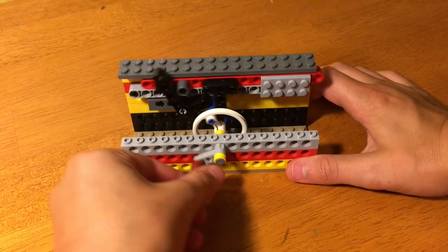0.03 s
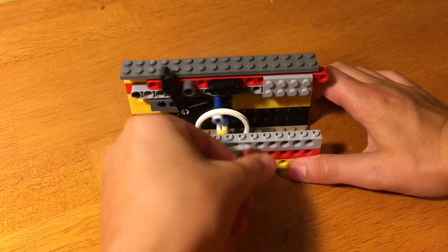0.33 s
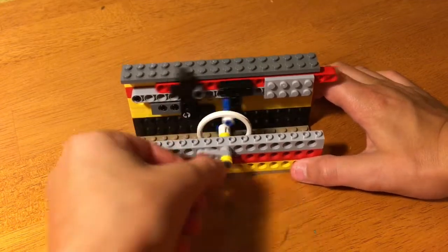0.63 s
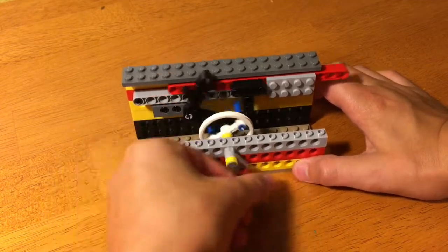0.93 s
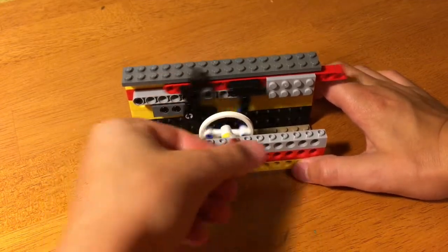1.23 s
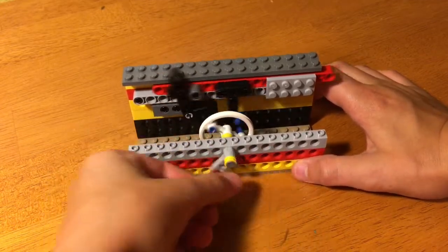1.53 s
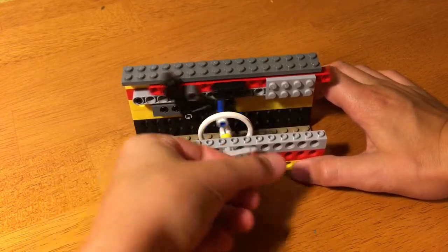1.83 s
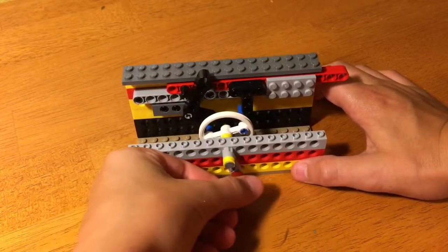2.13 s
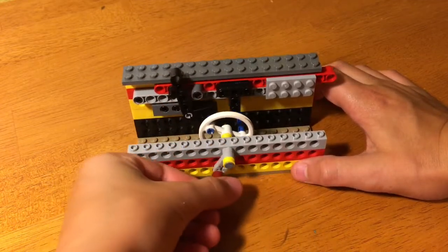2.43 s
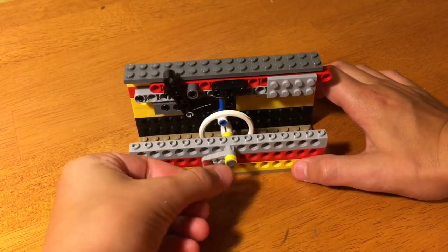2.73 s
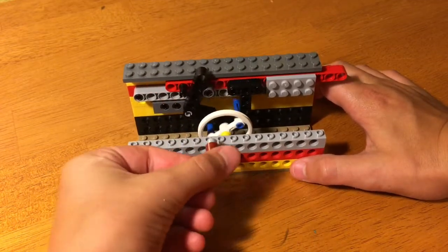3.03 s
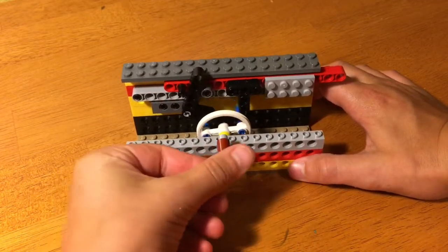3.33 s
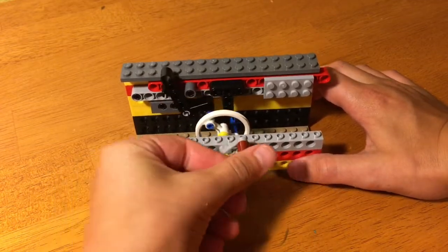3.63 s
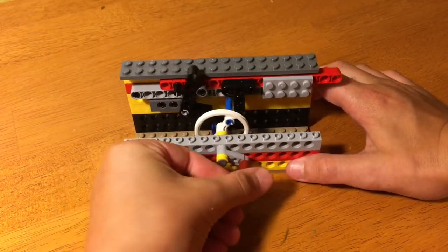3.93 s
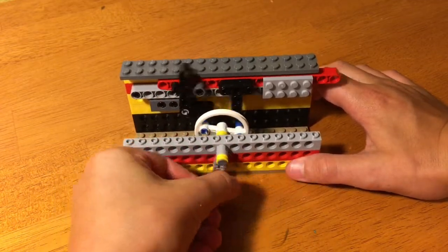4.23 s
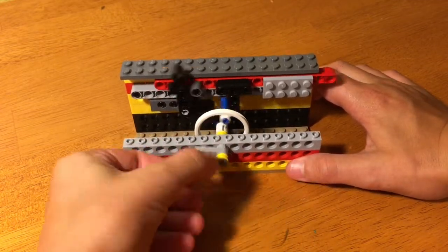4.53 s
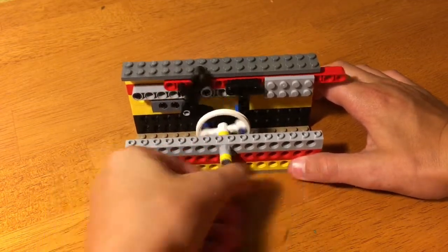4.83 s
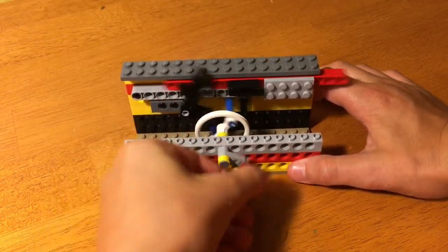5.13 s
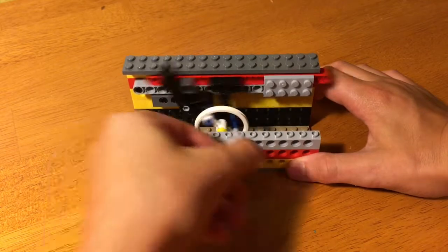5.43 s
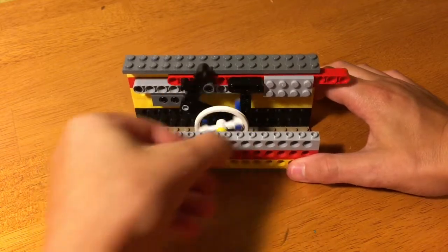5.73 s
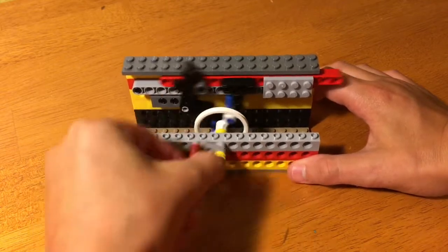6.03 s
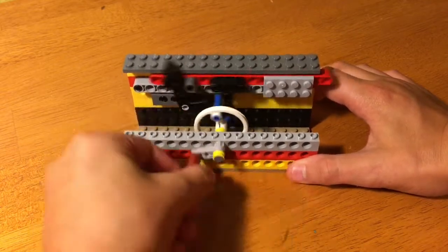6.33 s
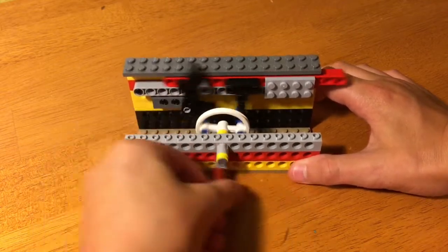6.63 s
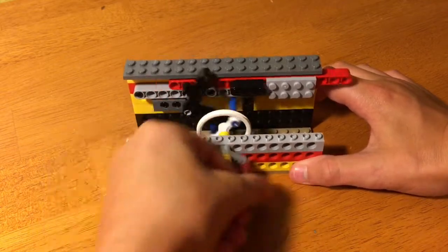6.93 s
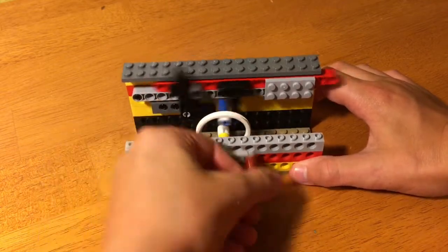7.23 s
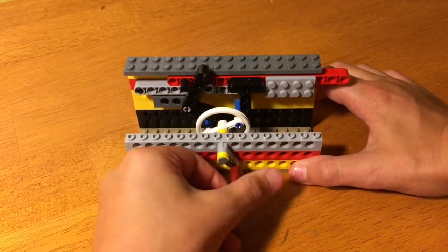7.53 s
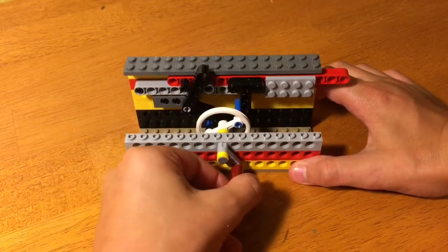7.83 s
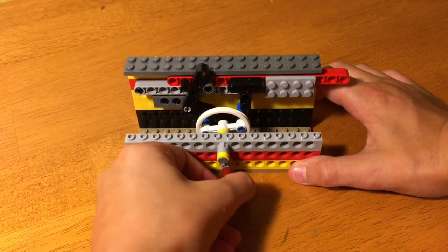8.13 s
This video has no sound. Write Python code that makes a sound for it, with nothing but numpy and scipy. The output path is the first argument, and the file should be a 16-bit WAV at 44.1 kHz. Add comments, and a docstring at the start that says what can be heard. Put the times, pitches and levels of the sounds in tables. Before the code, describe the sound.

A hand-cranked mechanism of plastic building bricks works on a wooden table, heard close in a small room. For the first 2 seconds it clicks and rattles lightly and unevenly, several times a second, with brief creaks, soft scraping and the faint high tinkle of a loose pin. From about 2 to 4.6 seconds it goes much quieter, with only scattered slow ticks. At about 4.7 seconds the turning becomes hard and fast: a sliding rack slams into its stop nine times, nearly three times a second, each sharp snap followed by smaller clacks of a loose lever falling back. The blows thump the frame against the table, with rough scraping underneath. Around 7.4 seconds it eases into a few soft clicks until the end at about 8 seconds. A faint, wavering low hum fills the room throughout.

```python
"""Hand-cranked plastic brick mechanism.

On a wooden table in a small room, a lever and a sliding rack clack against their stops: lightly, then
a few slow ticks, then hard and fast. Each hard turn kicks the rack along its guide into its stop and
the loose lever falls back a few times. Blows thump the frame on the table, sliding parts scrape and
creak, a loose pin tinkles. A low hum fills the room."""
import sys
import numpy as np
from scipy import signal
from scipy.fft import rfft, irfft, next_fast_len
from scipy.io import wavfile
from scipy.ndimage import uniform_filter1d

SR = 44100
rng = np.random.default_rng(int(sys.argv[2]) if len(sys.argv) > 2 else 0)


def dump_mix(stems):
    """Bounce the given channels to the path in sys.argv[1] as a 16-bit WAV at rate SR."""
    frames = np.atleast_2d(stems).T  # one column per channel
    limited = np.clip(frames, -1, 1)  # hard clip at full scale
    pcm = np.round(limited * 32767).astype(np.int16)
    wavfile.write(sys.argv[1], SR, pcm)


N = 360297
RING_SAMPLES, CUTOFF_HZ, MEDIUM_DB = 8192, 16100, -45

# Rack throws: start_s, travel_s, kick_db, slam_db, thump_db
THROWS = [(.0672, 0.06, -40.5, -35, -36.5), (4.7963, 0.052, -33.5, -26, -33.5),
          (5.182, 0.05, -33, -24.5, -32), (5.538, 0.06, -32.5, -28.5, -35.5),
          (5.8986, 0.061, -35.5, -26, -34.5), (6.2521, .0587, -38.5, -29, -36.5),
          (6.6166, 0.058, -39, -29, -37.5), (6.9607, .062, -37.5, -30, -32),
          (7.2989, 0.061, -35, -27, -33.5)]
# Where the rack catches: travel_fraction
CATCH_POINTS = [0.33, .55]
# Lever falling back on its stop: start_s, clack_db, snap_db
LEVER_FALLS = [(0.0232, -43, -48), (0.1003, -37.5, -40), (0.2779, -41, -43.5), (0.4098, -38, -47.5),
               (.53, -51, -46.5), (.548, -44, -52), (0.6848, -41, -51.5), (0.9042, -46, -83),
               (.926, -40, -44.5), (1.055, -40.5, -55), (1.1729, -37.5, -48), (1.309, -43.5, -40),
               (1.392, -40, -44), (1.5581, -46.5, -41.5), (1.664, -39, -39), (1.7403, -47, -51.5),
               (1.8113, -43, -44), (1.901, -37.5, -41.5), (2.0398, -57.5, -77), (2.3327, -69, -78),
               (2.4257, -59, -55), (2.8332, -58.5, -57.5), (3.0446, -58.5, -66), (4.252, -54, -57),
               (4.2744, -52, -57), (4.5397, -59, -60), (4.737, -44, -43), (4.9378, -33, -33),
               (4.9857, -32.5, -31.5), (5.01, -37.5, -33.5), (5.125, -37.5, -33), (5.2965, -40.5, -39.5),
               (5.365, -44.5, -39), (5.4446, -50.5, -56), (5.6473, -33.5, -35), (5.6643, -43, -42.5),
               (5.725, -45.5, -45), (5.8405, -40.5, -36), (6.004, -35, -28.5), (6.064, -43, -40),
               (6.3374, -34, -35), (6.3952, -43, -39.5), (6.5403, -43, -40.5), (6.714, -38.5, -50),
               (6.79, -40, -41), (6.8907, -39.5, -54), (7.0673, -34.5, -30.5), (7.137, -37.5, -48),
               (7.1668, -42.5, -35.5), (7.24, -42.5, -38), (7.4545, -55.5, -63), (7.5238, -62.5, -69),
               (7.595, -56.5, -66), (7.6569, -52, -60.5), (7.6714, -44.5, -62.5), (7.8887, -55.5, -64),
               (7.9217, -49.5, -57.5)]
# Rack clicking on its guide: start_s, level_db
RACK_CLICKS = [(0.0369, -37.5), (0.2603, -46.5), (0.5676, -45.5), (0.7812, -44.5), (0.8176, -44.5),
               (0.8383, -43), (1.0337, -46.5), (1.0769, -47.5), (1.1086, -49), (1.2663, -38.5),
               (1.3001, -38), (1.5676, -45), (1.832, -41.5), (2.1293, -64.5), (2.3767, -60.5),
               (2.3939, -52), (2.7915, -64.5), (2.9497, -71), (2.994, -59.5), (3.3831, -68), (3.469, -70),
               (3.5133, -64.5), (3.861, -64), (3.8966, -63), (4.559, -57), (4.6699, -43.5), (4.6937, -49.5),
               (4.7511, -40.5), (5.084, -34), (5.1577, -41.5), (5.389, -33.5), (5.48, -38.5), (5.492, -33),
               (5.5548, -29), (5.8216, -32), (5.882, -40.5), (6.0899, -37.5), (6.1543, -34), (6.1757, -45),
               (6.4054, -37.5), (6.4247, -37.5), (6.5068, -45.5), (6.7209, -31.5), (6.85, -44),
               (6.8607, -32.5), (6.9005, -33.5), (7.209, -28), (7.431, -48.5)]
# Pin flicks: start_s, level_db
TINKLES = [(0.2368, -60), (.487, -63.5), (0.7427, -61), (0.991, -62), (1.2559, -60.5), (1.475, -63),
           (1.548, -67), (1.718, -60.5), (1.971, -59), (2.063, -69), (2.0976, -68), (3.882, -68.5),
           (4.0145, -57)]
# Rack stick-slip: start_s, length_s, slip_rate_hz, level_db
CREAKS = [(.022, 0.036, 640, -39.5), (0.278, 0.033, 420, -47.5), (0.54, 0.05, 550, -52),
          (1.055, 0.03, 530, -50)]
# Crank effort as friction level: time_s, effort_db
EFFORT = [(0, -57.5), (.6, -57), (.93, -54.5), (1.2, -61), (1.95, -54), (2.18, -67.5), (2.9, -65),
          (3.3, -67), (3.8, -66), (4.05, -62.5), (4.55, -66.5), (4.95, -47), (5.55, -45), (5.76, -53.5),
          (6.4, -44), (6.75, -51.5), (7.25, -44), (7.5, -62.5), (8.17, -67)]
# Lever taking up its play: effort_db, delay_s
LEVER_PLAY = [(-56.5, 0.001967), (-48, .001)]
# Loose parts settling at low effort: effort_db, gain_db
SETTLING = [(-74.5, -13.5), (-62, -0.5)]

# Modes of frame, lever, hollow bricks, pin: freq_hz, level_db, t60_s, gain_db_per_force_db
FRAME_MODES = [(135, -3, 0.2, 0.06), (159, -7, 0.15, -0.36), (212.6, -7, 0.28, -0.22),
               (232.5, -7.5, 0.38, -0.05), (266.5, -4.5, 0.23, 0), (305, 0.5, 0.15, 0.02),
               (352.2, 2, 0.16, 0.5), (402, -4, 0.14, 0.35), (460.3, -3, 0.18, 0.48), (545, -2.5, 0.059, 0),
               (622.6, -2, 0.089, 0.23)]
LEVER_MODES = [(711, -10.5, 0.055, -0.18), (832, -6, 0.021, 0), (991.5, -9, 0.036, 0), (1183, -1, 0.021, 0),
               (1216, -1, 0.026, 0), (1320, -2.5, 0.022, 0.25), (1457, -5, 0.015, 0),
               (1554, -6.5, 0.027, 0.14), (1638, -9.5, 0.015, 0), (1890, -8, 0.014, 0.24),
               (2140, -21, 0.032, 0.35)]
BRICK_MODES = [(1820, 6, 0.031, -0.39), (2126, 1, 0.062, -0.19), (2730, -2, 0.046, -0.15),
               (3444, -7.5, 0.048, -1), (4225, 0.5, 0.024, 0), (4600, 0.5, 0.01, 0.5),
               (4885, -7.5, 0.029, 0.5), (5380, -17.5, 0.038, 1.16), (6090, -12, 0.024, 1),
               (6570, -15, 0.076, 0), (7890, -5, 0.028, 0), (9190, 4, 0.012, 0), (11020, -6.5, 0.013, 0.5)]
PIN_MODES = [(4400, -5, 0.12, 16), (5200, -26, .28, 8), (7100, 13, 0.15, 14), (13020, 11, 0.092, 14)]
# Spectra of brick contact, stick-slip, sliding, axle, room noise: freq_hz, gain_db
SNAP_SPECTRUM = [(200, -14.5), (700, -4.5), (1500, 3), (2100, 6), (2450, 5), (2800, 4), (3400, 2),
                 (4800, 5.5), (6900, -2), (9200, -5), (10500, -8.5), (13200, -10.5), (16000, -16)]
CREAK_SPECTRUM = [(500, -13), (1250, 14), (1800, -6), (2400, -19), (3400, 7.5), (5000, -3), (6500, -11),
                  (12000, -20)]
SCRAPE_SPECTRUM = [(60, -1.5), (200, 10.5), (350, 8), (550, 3.5), (1250, 2), (2100, -9), (3400, -9.5),
                   (4900, -11), (9000, -20.5), (16000, -45.5)]
RUMBLE_SPECTRUM = [(60, -35), (130, 17), (180, -3.5), (220, -3), (300, 2), (400, 8), (470, -6),
                   (560, -26.5), (900, -41), (3000, -58.5)]
AIR_SPECTRUM = [(15, -60.5), (30, -18), (55, -1.5), (85, 5), (125, -2), (175, -11), (260, -24),
                (400, -21.5), (650, -28.5), (1300, -48), (2400, -37), (5000, -52), (9000, -43.5),
                (16000, -52)]

# Axle rumble and rattle against effort: at_medium_db, slope_db_per_db
RUMBLE_LAW = (-51.5, 0.71)
RATTLE_LAW = (-40, 1.47)
# Frame, lever and treble response against knock level: at_medium_db, slope_db_per_db
CLICK_THUMP_LAW, CLICK_CLACK_LAW = (-47, 0.58), (-53, 0.64)
FALL_THUMP_LAW, TREBLE_LAW = (-49.5, 0.74), (-3, 0.31)

# Room decay: freq_hz, t60_s
ROOM_DECAY = [(120, 1), (400, 0.28), (1100, 0.22), (2800, 0.23), (7000, 0.24), (15000, 0.17)]
# Room hum: time_s, level_db
HUM_LEVEL = [(0, -51), (.7, -61), (1.6, -51), (2.2, -58.5), (2.65, -48.5), (3.3, -56), (4.3, -56.5),
             (5.4, -51), (5.9, -54), (6.8, -51), (7.7, -54), (8.17, -51)]


def knocks(treble_spread_db=4, rebound_s=.0065, rebound_db=-11):
    """Each contact snaps, rebounds, rings lever and bricks and thumps the frame on the table."""
    blows = [throws(), lever_falls(), click(*np.transpose(RACK_CLICKS)), pin_flicks(), rattle()]
    start_s, thump_db, clack_db, snap_db = np.hstack(blows)
    treble_db = follow(TREBLE_LAW, snap_db) + treble_spread_db * rng.uniform(-1.26, 1, len(start_s))
    lever = bounce(ring(LEVER_MODES, clack_db, spread_db=4, rise_s=.003, detune=.065))
    frame = ring(FRAME_MODES, thump_db, spread_db=4, rise_s=.004, detune=.025)
    bricks = bounce(ring(BRICK_MODES, snap_db, spread_db=6.5, rise_s=.0012, detune=.008))
    snap = place(start_s, at_level(snaps(treble_db), snap_db - 5.5)) + run_up(start_s, snap_db)
    again_s = start_s + rebound_s * (.5 + rng.random(len(start_s)))
    snap += place(again_s, at_level(snaps(treble_db), snap_db + rebound_db))
    snap += place(start_s, at_level(bricks, snap_db - 7))
    clack = place(start_s + lookup(LEVER_PLAY, effort(start_s)), at_level(lever, clack_db))
    thump = place(start_s, at_level(frame, thump_db))
    room_send = amp(-4.5) * snap + amp(1.5) * clack + amp(-5) * thump
    return snap + clack + thump + room(room_send, tail_db=-6)


def throws(catch_jitter=.06):
    """The lever kicks the rack, which catches on the way and slams into its stop."""
    start_s, travel_s, kick_db, slam_db, thump_db = np.transpose(THROWS)
    kick = np.array([start_s, thump_db - 5, kick_db, kick_db + 2])
    blows = [kick, click(start_s + travel_s, slam_db, thump_db)]
    for fraction in CATCH_POINTS:
        catch_s = start_s + travel_s * (fraction + catch_jitter * rng.standard_normal(len(start_s)))
        blows.append(click(catch_s, slam_db - 10, thump_db - 4))
    return np.hstack(blows)


def lever_falls():
    """The loose lever hits its stop and jolts the frame."""
    start_s, clack_db, snap_db = np.transpose(LEVER_FALLS)
    return np.array([start_s, follow(FALL_THUMP_LAW, clack_db), clack_db, snap_db])


def click(start_s, snap_db, thump_db=None):
    """Hard contact jolting frame and lever. Rows: start_s, thump_db, clack_db, snap_db."""
    if thump_db is None:
        thump_db = follow(CLICK_THUMP_LAW, snap_db)
    return np.array([start_s, thump_db, follow(CLICK_CLACK_LAW, snap_db), snap_db])


def snaps(treble_db, crack_s=0.0024, chatter_s=0.01, chatter_db=-6, chatter_top_hz=7500, size=2048):
    """Edges crack together, then neighbouring bricks give a brief, duller chatter."""
    t, count = np.arange(size) / SR, len(treble_db)
    roughness = np.exp(.3 * unit_rms(uniform_filter1d(rng.standard_normal((count, size)), 90)))
    crack, chatter = rng.standard_normal((2, count, size)) * roughness
    crack *= np.exp(-t / crack_s) * (1 - np.exp(-t / 0.00043))
    chatter *= amp(chatter_db) * np.exp(-t / chatter_s) * (1 - np.exp(-t / 0.0023))
    chatter = signal.lfilter(*signal.butter(1, chatter_top_hz, fs=SR), chatter)
    return contact_filter(crack, treble_db) + contact_filter(chatter, treble_db)


def contact_filter(x, treble_db):
    """Each contact point has its own resonances and treble; minimum phase."""
    hz = abs(np.fft.fftfreq(x.shape[-1], 1 / SR))
    knots_hz = np.linspace(0, np.sqrt(SR / 2), num=80) ** 2
    knots_db = rng.uniform(-6, 6, (len(x), len(knots_hz)))
    knots_db += 8 * uniform_filter1d(rng.standard_normal(knots_db.shape), 9)
    resonance_db = np.array([np.interp(hz, knots_hz, row) for row in knots_db])
    shelf_db = (treble_db[:, None] + 7.5) * np.interp(hz, [5500, 10000], [0, 1])
    log_gain = np.log(amp(lookup_hz(SNAP_SPECTRUM, hz) + resonance_db + shelf_db))
    return np.fft.ifft(np.fft.fft(x) * np.exp(np.conj(signal.hilbert(log_gain)))).real


def ring(modes, force_db, spread_db, rise_s, detune):
    """Damped modes, one row a blow; each blow lands elsewhere and excites them differently."""
    t = np.arange(RING_SAMPLES) / SR
    out = np.zeros((len(force_db), RING_SAMPLES))
    excess_db = np.clip(force_db - np.median(force_db), -12, 12)[:, None]
    for hz, level_db, t60_s, growth in modes:
        age_s = t[t < t60_s]
        strength, shift, phase = rng.uniform(-1.034, 1, (len(force_db), 3)).T[:, :, None]
        angle = 2 * np.pi * hz * (1 + detune * shift) * age_s + np.pi * phase
        gain = amp(level_db + growth * excess_db + spread_db * strength)
        out[:, :len(age_s)] += gain * np.sin(angle) * amp(-60 * age_s / t60_s)
    fade_out = np.minimum(1, 10 * (1 - t / t[-1]))
    return out * (1 - np.exp(-t / rise_s)) * fade_out


def bounce(sounds):
    """A loose part meets its stop twice, 1-5 ms apart."""
    lags_s, gains = rng.uniform([.001, .3], [.005, .9], (len(sounds), 2)).T
    return np.array([row + gain * np.r_[np.zeros(round(lag_s * SR)), row][:RING_SAMPLES]
                     for row, lag_s, gain in zip(sounds, lags_s, gains)])


def run_up(start_s, snap_db, lead_s=0.0031, lead_db=-11):
    """Parts scrape just before they hit their stop."""
    ahead_s = np.arange(RING_SAMPLES)[::-1] / SR
    swells = amp(snap_db + lead_db)[:, None] * np.exp(-ahead_s / lead_s)
    scrape = unit_rms(shaped(rng.standard_normal(N), SNAP_SPECTRUM))
    return place(start_s - RING_SAMPLES / SR, swells) * scrape


def rattle(count=200, spread_db=5):
    """Loose parts click at random, louder with effort."""
    start_s = (np.arange(count) + rng.random(count)) / count * N / SR
    effort_db = effort(start_s)
    level_db = follow(RATTLE_LAW, effort_db) + lookup(SETTLING, effort_db)
    return click(start_s, level_db + spread_db * rng.uniform(-2.4, 1, count))


def creaks(slip_spread_db=4):
    """The rack sticks and slips; uneven slips fuse into a hoarse chirp."""
    t = np.arange(RING_SAMPLES) / SR
    bursts = []
    for _, length_s, rate_hz, level_db in CREAKS:
        drift = .22 * unit_rms(uniform_filter1d(rng.standard_normal(RING_SAMPLES), 120))
        slip_count = np.floor(np.cumsum(rate_hz * (1 + drift)) / SR)
        slips = np.diff(slip_count, prepend=0) * amp(slip_spread_db * rng.standard_normal(RING_SAMPLES))
        envelope = np.sin(np.pi * np.minimum(t / length_s, 1))
        bursts.append(amp(level_db + 2) * unit_rms(slips - slips.mean()) * envelope)
    chirps = shaped(place(np.transpose(CREAKS)[0], bursts), CREAK_SPECTRUM)
    return chirps + room(chirps, tail_db=-7)


def pin_flicks(flick_db=13.5, body_db=-1):
    """Light clicks that set the pin ringing."""
    start_s, level_db = np.transpose(TINKLES)
    _, thump_db, clack_db, snap_db = click(start_s, level_db + flick_db)
    return np.array([start_s, thump_db + body_db, clack_db + body_db, snap_db])


def pin_tinkles(wobble_hz=38):
    """The flicked pin rings on, wobbling in its hole."""
    start_s, level_db = np.transpose(TINKLES)
    turns = wobble_hz * rng.uniform(.7, 1.4, (len(start_s), 1)) * np.arange(RING_SAMPLES) / SR
    pin = sum(ring(PIN_MODES, level_db, spread_db=5, rise_s=.003, detune=.011) for _ in range(3))
    return place(start_s, at_level(pin * (1 + np.cos(2 * np.pi * turns)), level_db + 2.5))


def friction(ticks_per_s=300, spread_db=6.5, tick_decay_s=0.01):
    """Sliding parts scrape, rougher with effort; the axle rumbles through the frame."""
    t = np.arange(N) / SR
    effort_db = effort(t)
    rack_scrape, rack_rumble = rack_slide(t)
    ticks = (rng.random(N) < ticks_per_s / SR) * amp(spread_db * np.minimum(rng.exponential(1, N), 3))
    flutter = unit_rms(signal.lfilter([1], [1, -np.exp(-1 / (tick_decay_s * SR))], ticks))
    catching = np.interp(effort_db, [-68, -52], [.3, 1])
    drive = (catching * flutter + amp(-4)) * rng.standard_normal(N)
    scrape = unit_rms(shaped(drive, SCRAPE_SPECTRUM)) * np.hypot(amp(effort_db), rack_scrape)
    axle_gain = amp(follow(RUMBLE_LAW, effort_db))
    rumble = unit_rms(shaped(drive, RUMBLE_SPECTRUM)) * np.hypot(axle_gain, rack_rumble)
    return amp(-6) * scrape + amp(-5) * rumble


def rack_slide(t, scrape_db=-14.5, rumble_db=-15.5, fade_s=0.031):
    """Scrape and rumble gains of the thrown rack: held in travel, fading after the slam."""
    start_s, travel_s, _, slam_db, thump_db = np.transpose(THROWS)[:, :, None]
    moving = (t > start_s) * np.exp(-np.maximum(t - start_s - travel_s, 0) / fade_s)
    return (amp(slam_db + scrape_db) * moving).sum(0), (amp(thump_db + rumble_db) * moving).sum(0)


def effort(time_s, hush_db=-7, hush_s=0.025):
    """Friction level in dB; parts press tight and fall quiet just before a throw."""
    ahead_s = np.transpose(THROWS)[0][:, None] - time_s
    pressed = ((ahead_s > 0) * np.exp(-(ahead_s / hush_s) ** 2)).sum(0)
    return lookup(EFFORT, time_s) + hush_db * pressed


def room(x, tail_db, build_s=0.0011, echoes_per_s=8000, paths=5):
    """Table and wall reflections; the paths change as hands and parts move."""
    size, t = SR * 3 // 5, np.arange(N) / SR
    out = np.zeros(N)
    for k in range(paths):
        taps = rng.choice([-1., 1.], size) * (rng.random(size) < echoes_per_s / SR)
        hz, age_s, bands = signal.stft(taps, SR, nperseg=256)
        decay = amp(-60 * age_s / lookup_hz(ROOM_DECAY, hz)[:, None])
        onset = 1 - np.exp(-age_s / build_s)
        near_surfaces = 1 + 0.28 * np.exp(-age_s / 0.014)
        tail = signal.istft(bands * decay * onset * near_surfaces, SR, nperseg=256)[1]
        share = np.sqrt(2 / paths) * np.cos(2 * np.pi * ((2 + 1.3 * k) * t + rng.random()))
        out += signal.oaconvolve(x * share, tail / np.linalg.norm(tail))[:N]
    return amp(tail_db) * out


def background(air_db=-57, hum_hz=89.7, wander_hz=2.19, swell_depth=0.24):
    """Soft room noise and a low hum wavering in pitch and level."""
    slow_spectrum = [(0, 0), (5, 0), (12, -30), (40, -120)]  # freq_hz, gain_db
    wander, swell = (unit_rms(shaped(rng.standard_normal(N), slow_spectrum)) for _ in range(2))
    phase = 2 * np.pi * np.cumsum(hum_hz + wander_hz * wander) / SR
    hum = unit_rms((1 + swell_depth * swell) * np.sin(phase))
    air = unit_rms(shaped(rng.standard_normal(N), AIR_SPECTRUM))
    return amp(air_db) * air + amp(lookup(HUM_LEVEL, np.arange(N) / SR) - 2) * hum


def amp(db):
    """dB to gain."""
    return 10 ** (np.asarray(db) / 20)


def unit_rms(x):
    """Each row at rms 1."""
    return x / np.sqrt(np.mean(x ** 2, axis=-1, keepdims=True) + 1e-20)


def at_level(sounds, level_db):
    """Each row gets the energy of 10 ms at its level."""
    rms_10ms = np.sqrt(np.sum(sounds ** 2, axis=1) / (SR / 100) + 1e-20)
    return sounds * (amp(level_db) / rms_10ms)[:, None]


def follow(law, force_db):
    """Straight line in dB about MEDIUM_DB."""
    return law[0] + law[1] * (force_db - MEDIUM_DB)


def lookup(table, x):
    """Linear interpolation."""
    return np.interp(x, *np.transpose(table))


def lookup_hz(table, hz):
    """Log-frequency interpolation."""
    knots_hz, values = np.transpose(table)
    return np.interp(np.log(hz + 1), np.log(knots_hz + 1), values)


def shaped(x, spectrum):
    """Zero-phase filter for a whole track."""
    size = next_fast_len(N, True)
    gain = amp(lookup_hz(spectrum, np.fft.rfftfreq(size, 1 / SR)))
    return irfft(rfft(x, size) * gain, size)[:N]


def place(starts_s, sounds):
    """Sums rows into one track at their start times."""
    track = np.zeros(N + 3 * RING_SAMPLES)
    for start_s, sound in zip(starts_s, sounds):
        first = max(round(start_s * SR) + RING_SAMPLES, 0)
        track[first:first + len(sound)] += sound
    return track[RING_SAMPLES:RING_SAMPLES + N]


def scene():
    """Mechanism and room, mono."""
    return (knocks() + creaks() + pin_tinkles() + friction() + background())[None]


def record(dry):
    """Steep low-pass."""
    lowpass = signal.firwin(511, CUTOFF_HZ, window=("kaiser", 9), fs=SR)
    return signal.oaconvolve(dry, lowpass[None], "same")


dry = scene()
out = record(dry)
dump_mix(out)
```